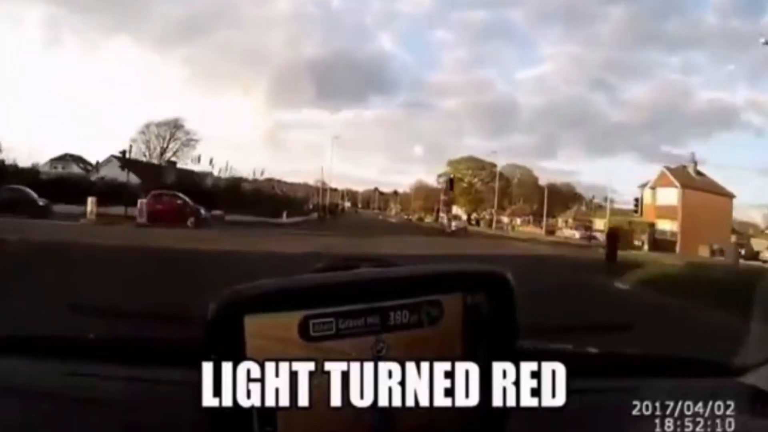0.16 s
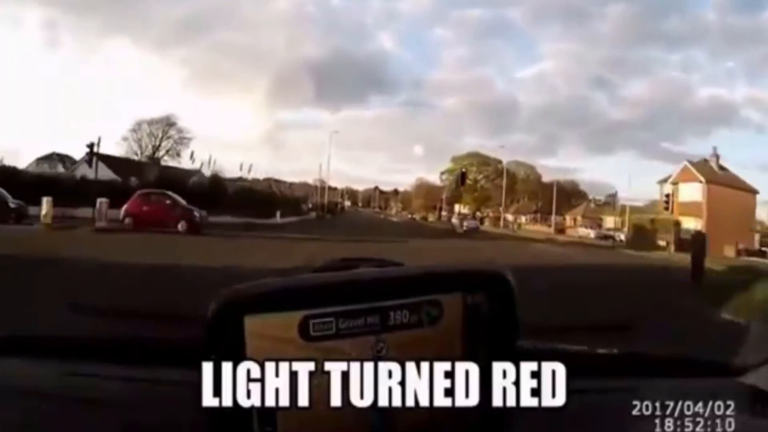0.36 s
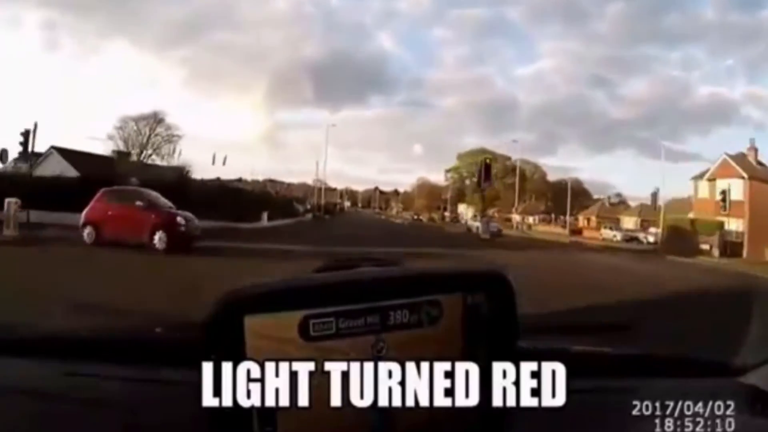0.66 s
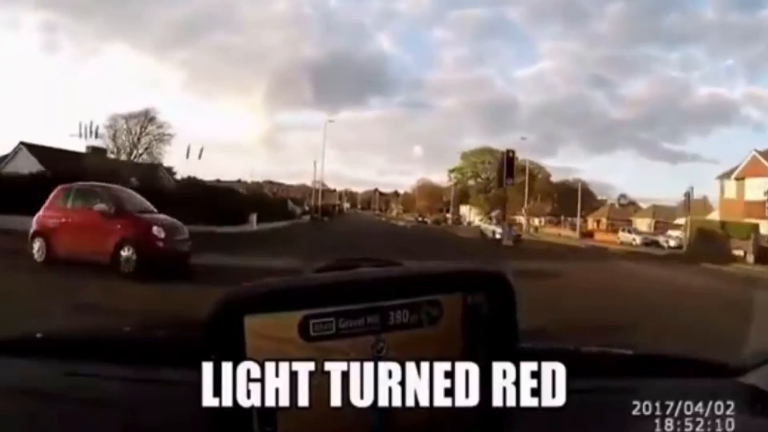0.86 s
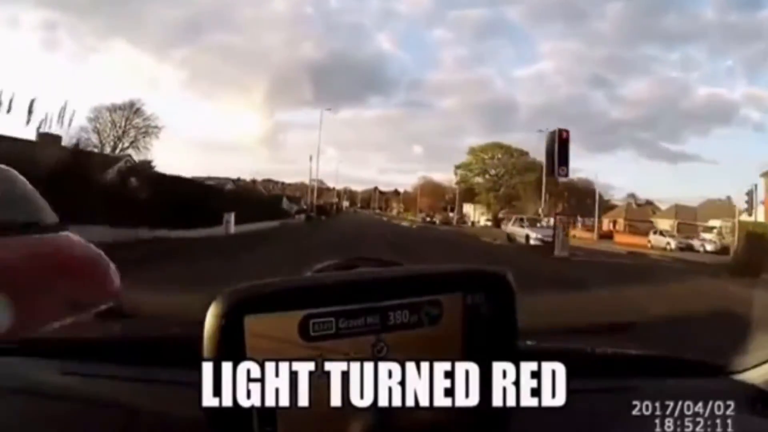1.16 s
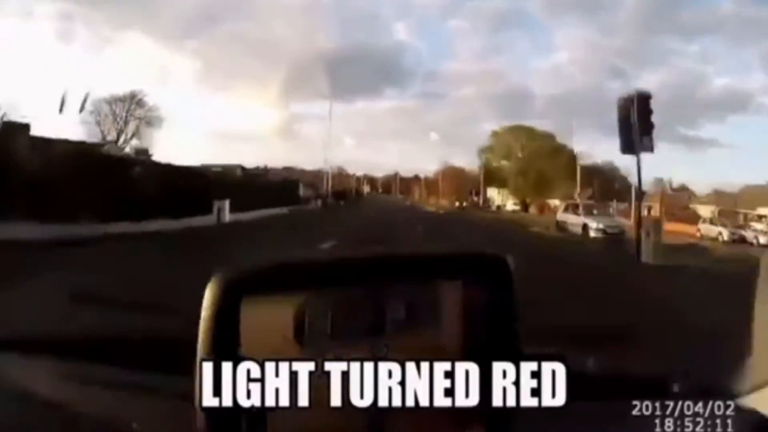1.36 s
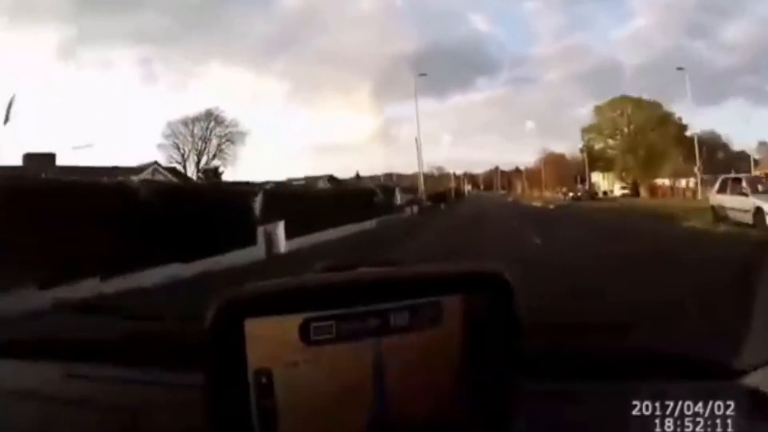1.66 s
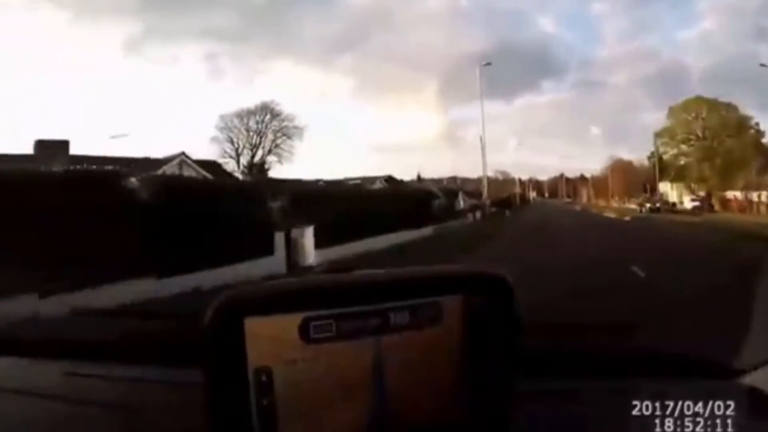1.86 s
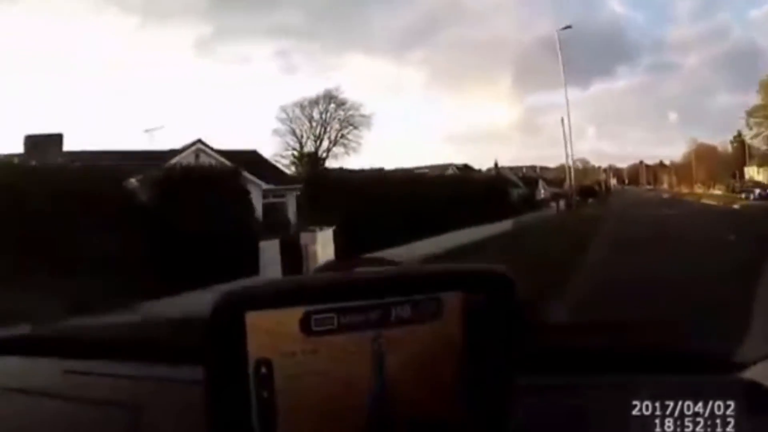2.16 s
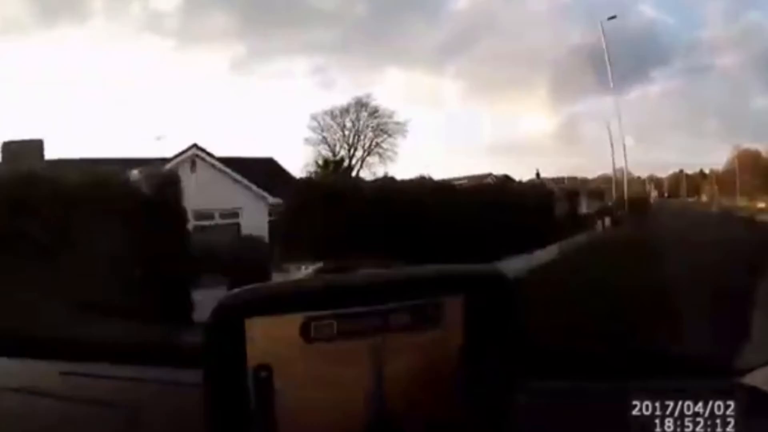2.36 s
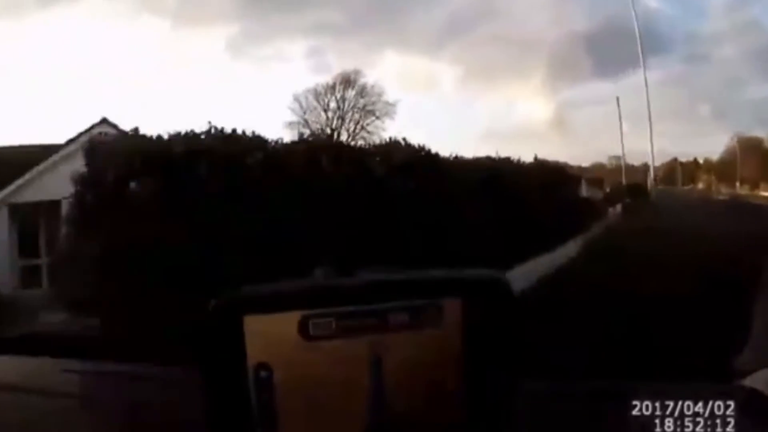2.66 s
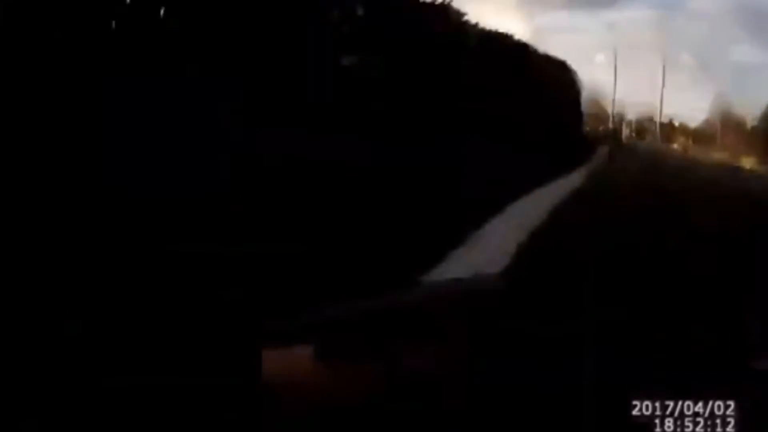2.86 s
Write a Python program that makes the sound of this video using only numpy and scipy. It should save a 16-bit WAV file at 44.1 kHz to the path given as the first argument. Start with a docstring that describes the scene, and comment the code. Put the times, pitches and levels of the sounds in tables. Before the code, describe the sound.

A car crash heard inside the cabin by a small windscreen camera. Until 1.45 s, muffled road and engine rumble with faint rustling. At 1.47 s a huge, clipped bang with crunching panels and splintering plastic. Then the car shakes and judders, tyres scrub and chirp, trim clatters, with thuds near 1.85, 2.1 and 2.2. A second bang hits around 2.53, followed by rattles and a thin falling squeal near 2.75.

```python
"""Inside a moving car, heard by a camera on the windscreen: road rumble, then another car hits its side.
Filtered noise makes the road, the rustling and the body's shaking; one pressure pulse is the blow.
Grainy noise, resonances and splinter ticks make the crunching panels and rattling trim; dents boom as sines.
The car skids with scrub, judder and chirps and bangs again, probably on a kerb.
Something rubs with a thin squeal of wavering sines."""
import sys
import numpy as np
from scipy import signal
from scipy.fft import rfft, irfft, next_fast_len
from scipy.io import wavfile
from scipy.ndimage import uniform_filter1d, map_coordinates

SR = 44100
rng = np.random.default_rng(int(sys.argv[2]) if len(sys.argv) > 2 else 0)


def wav_record(signal):
    """Record a signal, one row per channel, as 16-bit PCM in the file named by sys.argv[1]."""
    frames = np.transpose(np.atleast_2d(signal))
    bounded = np.clip(frames, -1, 1)
    # unit amplitude maps onto the largest positive 16-bit level
    quanta = np.round(bounded * 32767).astype(np.int16)
    wavfile.write(sys.argv[1], SR, quanta)


N = 132300  # 3 s

# left-right likeness of large panels, of rattles and of the body's low shaking (1 = identical)
PANEL_ALIKE, RATTLE_ALIKE, LOW_ALIKE = 0.96, 0.67, 0.95


def amp(db):
    """Decibels to gain."""
    return 10 ** (np.asarray(db) / 20)


def unit(x):
    """Scale to rms 1."""
    return x / np.sqrt(np.mean(x ** 2) + 1e-20)


def clock():
    """Seconds at each sample."""
    return np.arange(N) / SR


def curves(rows):
    """One value per sample for each column after the time; the end values hold."""
    time_s, *columns = np.transpose(rows)
    return [np.interp(clock(), time_s, column) for column in columns]


def wobble(rate):
    """A smooth random curve, rate knots a second."""
    knots = rng.standard_normal(4096)
    return map_coordinates(knots, [clock() * rate + 2], mode="wrap")


def filtered(x, response):
    """x times a response of frequency."""
    size = next_fast_len(N + SR // 2)
    spectrum = rfft(x, size) * response(np.fft.rfftfreq(size, 1 / SR))
    return irfft(spectrum, size)[..., :N]


def coloured(x, points):
    """x shaped by (pitch_hz, gain_db) points, at rms 1; the lowest few hertz are weakened."""
    point_hz, point_db = np.transpose(points)

    def response(hz):
        gain_db = np.interp(np.log(hz + 1), np.log(point_hz + 1), point_db)
        return amp(gain_db) * hz / (hz + 2)

    return unit(filtered(x, response))


def pair(alike):
    """White noise for two ears with the given likeness, mixed from a shared and an opposed part."""
    turn = np.arccos(np.clip(alike, 0, .995)) / 2
    mid, side = rng.standard_normal((2, N)) * [[np.cos(turn)], [np.sin(turn)]]
    return np.array([mid + side, mid - side])


def grains(rate, spread_db, life_s):
    """Gain of many tiny contacts of unequal size; each one's energy dies by 1/e in life_s."""
    sizes = amp(spread_db * np.minimum(rng.exponential(size=N), 2.4))
    hits = (rng.random(N) < rate / SR) * sizes ** 2
    energy = signal.lfilter([1], [1, -np.exp(-1 / (life_s * SR))], hits)
    return unit(np.sqrt(energy))


def swell(s, width_s):
    """A bell-shaped rise and fall."""
    return np.exp(-((clock() - s) / width_s) ** 2)


def ringing(x, modes):
    """x with narrow resonances added to it."""
    def response(hz):
        total = 1
        for mode_hz, width_hz, db in modes:
            damping = 1j * hz * width_hz
            total = total + amp(db) * damping / (mode_hz ** 2 - hz ** 2 + damping)
        return total

    return filtered(x, response)


# colour of the road noise in the cabin: pitch_hz, gain_db
ROAD_COLOUR = [(12, 3), (20, -0.5), (35, 2.5), (75, -16.5), (125, -16.5), (207, -28.5), (300, -35.5),
               (410, -37.5), (550, -39.5), (800, -46.5), (1200, -44.5), (1650, -56.5), (2100, -58),
               (3350, -70), (9000, -123.5), (12000, -100)]
# cabin and tyre resonances: pitch_hz, width_hz, level_db (the level wavers around this, before the fade)
ROAD_BOOMS = [(150, 34.4, -43), (308.5, 63, -47.5), (738, 75, -62.5), (1166, 320, -62)]
# gain of the road's bass, before the fade: time_s, level_db
ROAD_BASS_LEVEL = [(0.03, -20), (.2, -23.5), (.5, -17), (.65, -25.5), (1.1, -23), (1.42, -26)]
ROAD_ALIKE, RUMBLE_ALIKE, HUSH_ALIKE = 0.83, 0.73, 0.051  # left-right likeness of middle, bass and treble
ROAD_FADE_S, ROAD_FADE_DB_PER_S = 1.55, 6.5  # the noise falls as the car slows


def road():
    """Tyre and engine rumble as shaped noise, with narrow noise bands for the booms; the treble is widest."""
    def bass(hz):
        return 1 / (1 + (hz / 90) ** 4)

    def treble(hz):
        return 1 - 1 / (1 + (hz / 1900) ** 4)

    def between(hz):
        return np.abs(1 - bass(hz) - treble(hz))

    # these three are shares of energy, hence the roots
    low = filtered(coloured(pair(RUMBLE_ALIKE), ROAD_COLOUR), lambda hz: np.sqrt(bass(hz)))
    middle = filtered(coloured(pair(ROAD_ALIKE), ROAD_COLOUR), lambda hz: np.sqrt(between(hz)))
    high = filtered(coloured(pair(HUSH_ALIKE), ROAD_COLOUR), lambda hz: np.sqrt(treble(hz)))
    bass_db, = curves(ROAD_BASS_LEVEL)
    out = amp(bass_db) * low + amp(-23 + 1.06 * wobble(9.16)) * (middle + high)
    for boom_hz, width_hz, db in ROAD_BOOMS:
        level = amp(db + 2.57 * wobble(7.86))
        boom = filtered(pair(ROAD_ALIKE), lambda hz: 1 / (1 + (2 * (hz - boom_hz) / width_hz) ** 2))
        out = out + level * unit(boom)
    return out * amp(-ROAD_FADE_DB_PER_S * np.maximum(clock() - ROAD_FADE_S, 0))


# tyres sliding sideways: time_s, scrub_db, judder_db
SKID = [(1.44, -58, -65), (1.49, -37.5, -29.5), (1.62, -44, -43), (1.65, -56, -60), (1.75, -40, -28.5),
        (1.86, -49, -38), (1.99, -51.5, -33), (2.06, -42, -25), (2.11, -48.5, -25.5), (2.19, -44.5, -22.5),
        (2.28, -38, -29.5), (2.37, -44, -20.5), (2.445, -60, -36), (2.475, -45, -33), (2.62, -55.5, -66),
        (2.75, -52, -34.5), (3, -49.5, -66)]
# colour of the scrub: pitch_hz, gain_db
SCRUB_COLOUR = [(100, -46), (320, -1.5), (450, 3), (640, 7), (780, 13), (900, 9), (1050, 9.5), (1330, 8),
                (1650, -15.5), (12000, -19.5)]
# colour of the judder: pitch_hz, gain_db
JUDDER_COLOUR = [(30, -9.5), (60, 6.5), (125, 1), (165, -13), (230, -29), (500, -71)]
# short chirps and groans of the rubber: centre_s, pitch_hz (wavers around this), width_s, level_db
CHIRPS = [(.06, 1160, 0.027, -51.5), (1.701, 1299, 0.034, -44.5), (1.731, 975, 0.0083, -34),
          (1.88, 1250, 0.003, -40.5), (1.96, 1304, 0.0067, -41), (2.226, 1051, 0.0059, -34),
          (2.28, 745, 0.06, -42)]


def tyres():
    """Sliding rubber scrubs as grainy noise, judders as low noise and now and then chirps as a wavering sine."""
    scrub_db, judder_db = curves(SKID)
    gripping = pair(PANEL_ALIKE) * grains(700, spread_db=5.5, life_s=0.0034)
    out = amp(scrub_db) * coloured(gripping, SCRUB_COLOUR)
    out = out + amp(judder_db) * coloured(pair(LOW_ALIKE), JUDDER_COLOUR)
    for s, hz, width_s, db in CHIRPS:
        pitch = hz * (1 + 0.04 * wobble(350))
        chirp = np.sin(2 * np.pi * np.cumsum(pitch) / SR)
        out = out + amp(db) * swell(s, width_s) * unit(chirp)
    return out


# loose things shifting in the cabin: centre_s, width_s, level_db
RUSTLES = [(.2, 0.03, -64), (.335, 0.028, -63), (.45, 0.035, -62.5), (0.504, 0.0073, -59.5),
           (.59, 0.016, -67), (.97, 0.013, -66), (2.73, 0.03, -52.5)]
# colour of the rustling: pitch_hz, gain_db
RUSTLE_COLOUR = [(900, -28), (2000, 6.5), (3800, -0.5), (6500, -1.5), (10000, -13), (14000, -54)]
# narrow resonances added to the rustling and the crunch: pitch_hz, width_hz, level_db over the broad colour
BRIGHT_MODES = [(2716, 130, -3.5), (2957, 36, 0), (3476, 90, -3), (3910, 140, -5), (8210, 280, -2),
                (10800, 200, 5.5), (13400, 220, 2)]


def rustles():
    """Loose things shift and slide in short swells of grainy noise with narrow resonances."""
    level = sum(amp(db) * swell(s, width_s) for s, width_s, db in RUSTLES)
    sliding = pair(0.74) * grains(330, spread_db=-5.5, life_s=0.0015)
    return level * unit(ringing(coloured(sliding, RUSTLE_COLOUR), BRIGHT_MODES))


# the body shaking on its springs: time_s, level_db
SHAKE_LEVEL = [(1.40, -41), (1.47, -29), (1.66, -22.5), (1.74, -20), (2.05, -22.5), (2.4, -21.5),
               (2.6, -19), (2.88, -20.5), (3, -23.5)]
# colour of the shaking: pitch_hz, gain_db
SHAKE_COLOUR = [(15, 7.5), (25, 2.5), (38, 6.5), (55, -3), (90, -15), (140, -20.5), (230, -57), (500, -90)]
# jolts of the body: peak_s, peak_db, direction (sign of the pressure)
JOLTS = [(1.514, -14.5, -1), (1.556, -12.5, 1), (1.614, -14.5, 1), (1.637, -15, -1), (1.771, -17, 1),
         (1.808, -15, -1), (1.851, -10, -1), (1.908, -12, 1), (2.089, -9, -1), (2.363, -10.5, -1),
         (2.432, -10, -1), (2.515, -10.5, -1), (2.547, -12.5, 1), (2.647, -14.5, 1), (2.744, -13, -1),
         (2.774, -11.5, -1), (2.893, -12.5, -1)]
JOLT_S = 0.0032  # how fast a jolt rises and dies
# the collision's pressure blow
BLOW_S, BLOW_DB, BLOW_RISE_S, BLOW_FALL_S = 1.4705, 2.5, 0.0026, 0.0017


def body():
    """The collision's pressure blow, then jolts as short pulses, over low noise for the body's shaking."""
    width_s = np.where(clock() < BLOW_S, BLOW_RISE_S, BLOW_FALL_S)
    push = amp(BLOW_DB) * swell(BLOW_S, width_s)
    for s, db, direction in JOLTS:
        distance = np.abs(clock() - s) / JOLT_S
        pulse = np.exp(1 / 4 - np.hypot(distance, 1 / 4))  # a peak with a slightly rounded tip
        push = push + np.sign(direction) * amp(db) * pulse
    shake_db, = curves(SHAKE_LEVEL)
    return push + amp(shake_db) * coloured(pair(LOW_ALIKE), SHAKE_COLOUR)


# two bright ticks at the overloaded blow: start_s, level_db
BLOW_TICKS = [(1.4663, -34), (1.4715, -33)]
# colour of the bright ticks: pitch_hz, gain_db
TICK_COLOUR = [(7000, -39), (10300, -14), (11000, 3), (12100, 9), (13300, 3), (14300, -17)]
TICK_T60_S = 0.01


def blow_ticks():
    """Two bright ticks around the overloaded blow, as fast-dying noise."""
    t = clock()
    level = sum(amp(db - 60 * np.abs(t - s) / TICK_T60_S) * (t >= s) for s, db in BLOW_TICKS)
    return level * coloured(pair(RATTLE_ALIKE), TICK_COLOUR)


# splinters: ticks per second, middle pitch, cycles to die by 1/e, level against the rattle bursts
SHARD_RATE, SHARD_HZ, SHARD_CYCLES, SHARD_DB = 1400, 2400, 15, -9.5


def shards():
    """Splinters of plastic tick at random as dying sines, each at its own pitch and place; rms 1."""
    chance = rng.random((int(SHARD_RATE * N / SR), 3))
    start, octave, left = chance[:, :1], 2 * chance[:, 1:2] - 1, chance[:, 2:]
    hz = SHARD_HZ * 2 ** octave
    n = np.arange(SR // 50)
    ticks = np.sin(2 * np.pi * hz * n / SR) * np.exp(-hz * n / SR / SHARD_CYCLES)
    ticks = ticks * rng.exponential(size=hz.shape)
    at = ((start * N).astype(int) + n).ravel()
    return unit(np.array([np.bincount(at, (ticks * share).ravel(), N)[:N] for share in (left, 1 - left)]))


CABIN_T60_S = 0.061


def cabin(x, wet_db):
    """Close glass and trim answer within a few hundredths of a second, as a decaying noise echo."""
    t = np.arange(SR // 8) / SR
    tail = rng.standard_normal(len(t)) * amp(-60 * t / CABIN_T60_S)
    tail = tail / np.linalg.norm(tail)
    return x + amp(wet_db) * signal.fftconvolve(x, tail[None], axes=1)[:, :N]


# bursts of crunching and rattling, levels before the final balance: start_s, length_s, panel_db, rattle_db
CRUNCHES = [(1.471, .018, -28.5, -50), (1.486, 0.025, -28, -40.5), (1.515, 0.035, -37, -49.5),
            (1.58, 0.018, -33.5, -54), (1.596, 0.035, -35.5, -47), (1.678, 0.067, -46, -54),
            (1.742, 0.031, -33, -46.5), (1.783, 0.027, -35, -55), (1.898, 0.0073, -35, -50),
            (1.951, 0.011, -50, -48), (2.013, 0.03, -37.5, -55), (2.039, 0.035, -35, -48),
            (2.196, 0.019, -33, -52), (2.215, 0.017, -36, -45), (2.249, 0.083, -41.5, -57.5),
            (2.339, 0.024, -42, -49.5), (2.416, 0.014, -33.5, -49), (2.505, 0.019, -29, -49),
            (2.53, 0.024, -29, -46), (2.699, 0.047, -37, -54.5), (2.84, 0.016, -42.5, -56),
            (2.879, .013, -35.5, -44.5)]
CRUNCH_ATTACK_S, CRUNCH_RELEASE_S = 0.0083, 0.0064
# sharp knocks, levels before the final balance: start_s, panel_db, click_db
KNOCKS = [(1.4672, -23, -44), (1.4722, -21, -43), (1.508, -34, -49), (1.553, -31, -42), (1.579, -32, -54),
          (1.756, -38, -37), (1.849, -31.5, -60), (1.879, -35, -62), (2.087, -27.5, -45), (2.349, -34, -42),
          (2.512, -26, -54), (2.527, -24, -32), (2.538, -16.5, -40), (2.546, -26, -33.5),
          (2.8804, -27, -39.5)]
KNOCK_T60_S = 0.028
# loose trim buzzing, before its flutter and the final balance: time_s, level_db
LOOSE_LEVEL = [(1.42, -71), (1.48, -55), (1.66, -59), (1.82, -56), (1.99, -61), (2.4, -56.5), (2.45, -72),
               (2.5, -55), (2.62, -61.5), (2.75, -57), (3, -64)]
# colour of the panels: pitch_hz, gain_db
PANEL_COLOUR = [(90, 3), (220, 2), (330, 4), (480, 1.5), (800, -0.5), (1000, 1), (1300, 0.5), (1650, -15),
                (2100, -16), (2800, -24), (4000, -41), (7000, -62)]
# colour of the plastic trim: pitch_hz, gain_db
RATTLE_COLOUR = [(900, 5), (2200, 4.5), (3000, 0), (3700, 2.5), (4700, -4), (7400, -8), (8300, -4.5),
                 (9700, -8.5), (10800, -3), (12300, -10), (13300, -3), (14200, -19)]
# what the panels ring with: pitch_hz, width_hz, level_db over the broad colour
PANEL_MODES = [(215, 45, 0), (813, 58, -4), (1086, 53, -2.5)]
PANEL_WET_DB, TRIM_WET_DB = -8, -5  # cabin answer against the direct sound


def crunch():
    """Tiny contacts and hard knocks, as noise, sound the panels and plastic trim; splinters tick among them."""
    t = clock()
    bursts, knocks = np.zeros((2, N)), np.zeros((2, N))  # energies: panels, trim
    for s, length_s, panel_db, rattle_db in CRUNCHES:
        attack = np.clip((t - s) / CRUNCH_ATTACK_S, 0, 1)
        release = np.exp(-np.maximum(t - s - length_s, 0) / CRUNCH_RELEASE_S)
        bursts += (amp([[panel_db], [rattle_db]]) * attack * release) ** 2
    for s, panel_db, click_db in KNOCKS:
        decay = (t >= s) * amp(-60 * np.abs(t - s) / KNOCK_T60_S)
        knocks += (amp([[panel_db], [click_db]]) * decay) ** 2
    loose_db, = curves(LOOSE_LEVEL)
    bursts[1] += amp(loose_db + 1.9 * wobble(39.15)) ** 2

    panel_grains = grains(553, spread_db=3.5, life_s=0.0026)
    panel_level = np.sqrt(bursts[0] * panel_grains ** 2 + knocks[0])
    panel = panel_level * coloured(pair(PANEL_ALIKE), PANEL_COLOUR)
    trim_grains = grains(600, spread_db=6, life_s=0.004)
    trim_level = np.sqrt(bursts[1] * trim_grains ** 2 + knocks[1])
    trim = trim_level * coloured(pair(RATTLE_ALIKE), RATTLE_COLOUR)
    trim = trim + amp(SHARD_DB) * np.sqrt(bursts[1]) * shards()

    panel = cabin(ringing(panel, PANEL_MODES), PANEL_WET_DB)
    trim = cabin(ringing(trim, BRIGHT_MODES), TRIM_WET_DB)
    return amp(-4) * panel + amp(-2) * trim  # final balance


# large panels denting: start_s, level_db
THUDS = [(1.511, -25.5), (1.612, -32.5), (1.738, -34), (1.85, -31), (2.203, -23.5), (2.511, -24),
         (2.537, -23)]
# what they boom with: pitch_hz (before scatter), level_db against the dent, t60_s
THUD_MODES = [(220, -2, 0.087), (323, -2, 0.078), (520, -10, .04)]
THUD_SCATTER = 0.053  # each dent shifts the pitches by about this share


def thuds():
    """A large panel dents and booms briefly as dying sines, each time at slightly different pitches."""
    out, t = np.zeros(N + SR), np.arange(SR // 4) / SR
    for s, db in THUDS:
        start = round(s * SR)
        for hz, level_db, t60_s in THUD_MODES:
            pitch = hz * (1 + THUD_SCATTER * rng.standard_normal())
            decay = amp(db + level_db - 60 * t / t60_s)
            out[start:start + len(t)] += decay * np.sin(2 * np.pi * pitch * t)
    return out[:N]


# rubbing squeal, before its wavering: time_s, pitch_hz, level_db
SQUEAL = [(2.555, 2630, -90), (2.58, 2615, -65), (2.655, 2560, -62), (2.678, 2510, -64),
          (2.70, 2480, -55.5), (2.755, 2455, -53.5), (2.81, 2436, -57), (2.83, 2410, -80)]
# high modes of the squeal: pitch_hz, level_db against the main tone
WHISTLES = [(9550, -13), (14450, -16)]


def squeal():
    """A rubbing part sings: a rough sine sinks in pitch as the car slows, under high modes that do not sink."""
    def tone(pitch_hz, rough):
        return unit(np.sin(2 * np.pi * np.cumsum(pitch_hz * (1 + rough * wobble(400))) / SR))

    hz, db = curves(SQUEAL)
    high = sum(amp(level_db) * tone(mode_hz, rough=0.0048) for mode_hz, level_db in WHISTLES)
    return amp(db + 2 * wobble(110)) * (tone(hz, rough=0.005) + high)


def scene():
    """Everything that sounds in the cabin."""
    return road() + tyres() + rustles() + body() + blow_ticks() + crunch() + thuds() + squeal()


# colour of the hiss that follows the sound's level: pitch_hz, gain_db
HISS_COLOUR = [(3000, 1.5), (10300, -1.5), (10800, 9), (11600, 3.5), (12050, 17), (12500, -1), (13250, 8.5),
               (14000, -7), (15000, -8)]
HISS_DB, HISS_GROWS, HISS_FOLLOW_S = -61, 0.68, 0.0069  # overall level, growth exponent, averaging window
CLIP_TOP, TOP_HZ = .96, 15050  # full-scale limit, band limit


def record(dry):
    """The camera clips peaks, adds hiss that rises and falls with the sound, and cuts all above its band limit."""
    clipped = np.clip(dry, -CLIP_TOP, CLIP_TOP)
    # the hiss follows the left ear, mostly above 600 Hz
    power = filtered(clipped[0], lambda hz: hz / np.hypot(hz, 600)) ** 2
    smooth_power = np.abs(uniform_filter1d(power, int(HISS_FOLLOW_S * SR)))
    follow = unit(smooth_power ** (HISS_GROWS / 2))
    hiss = amp(HISS_DB) * follow * coloured(pair(0.34), HISS_COLOUR)
    return filtered(clipped + hiss, lambda hz: hz < TOP_HZ)


dry = scene()
out = record(dry)
wav_record(out)
```